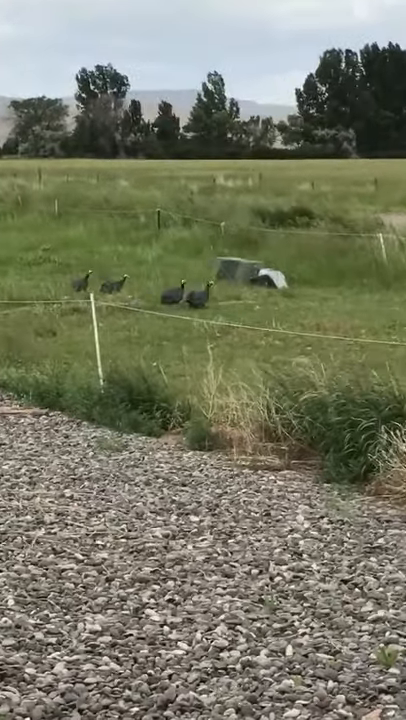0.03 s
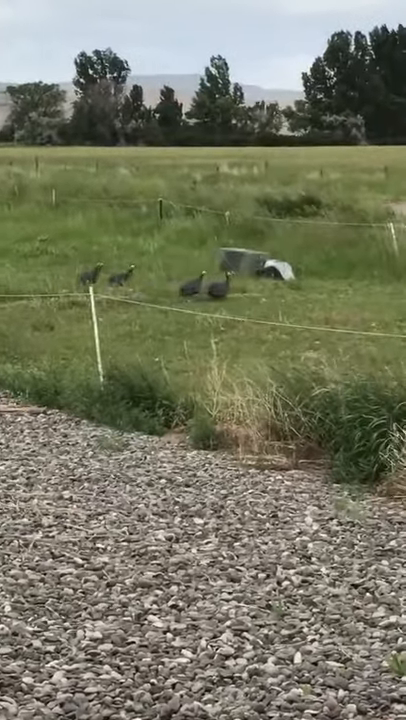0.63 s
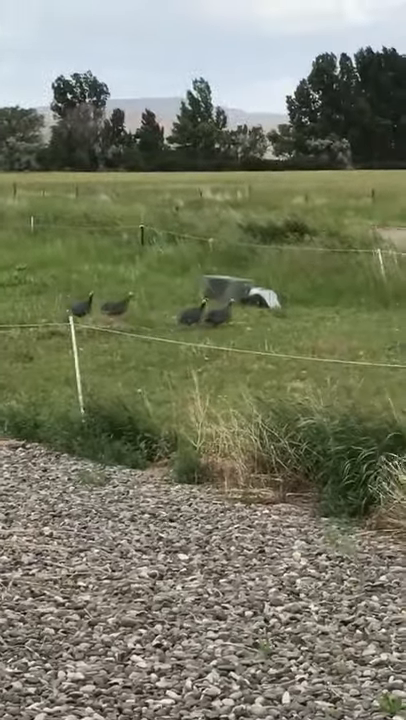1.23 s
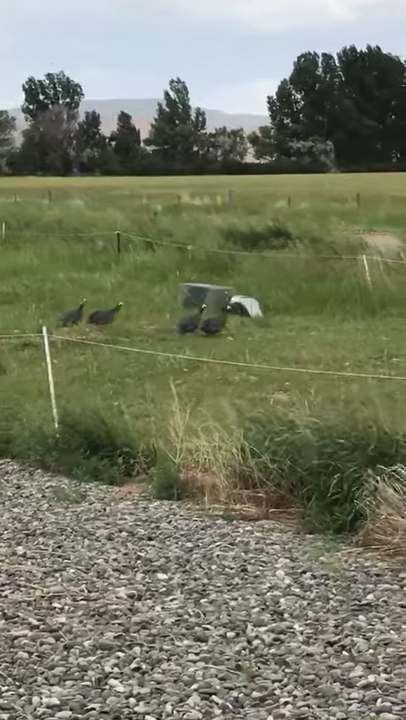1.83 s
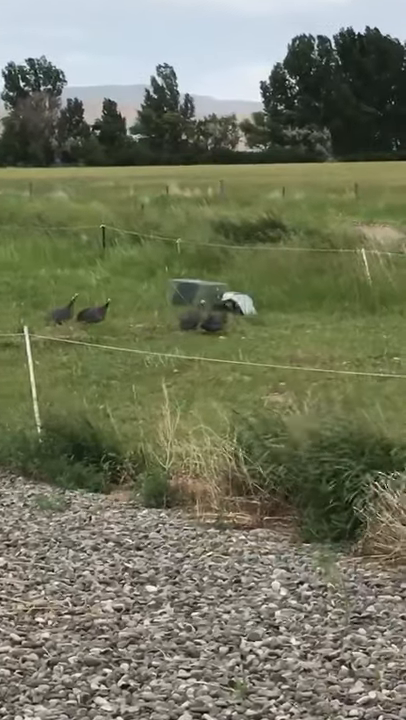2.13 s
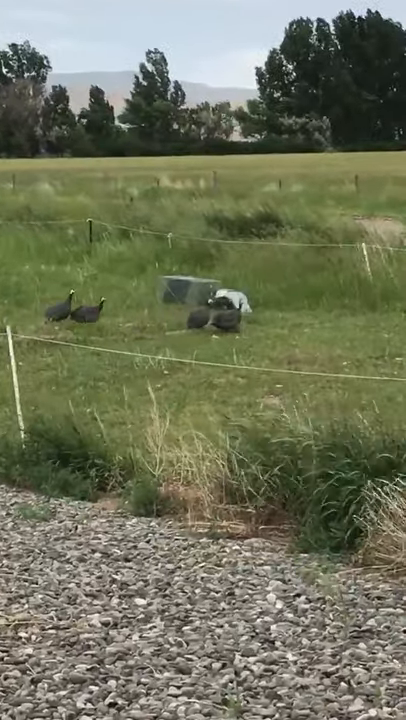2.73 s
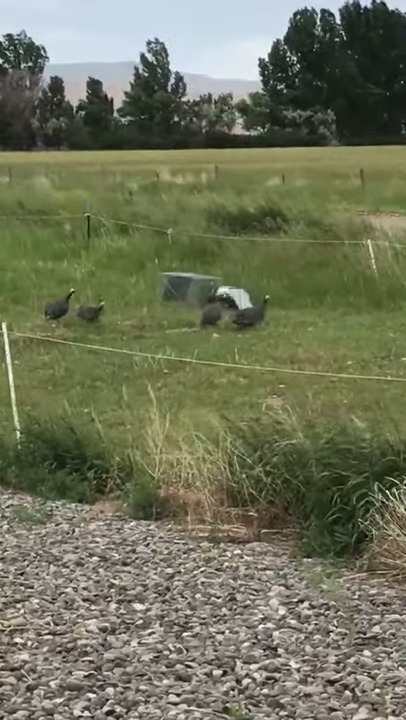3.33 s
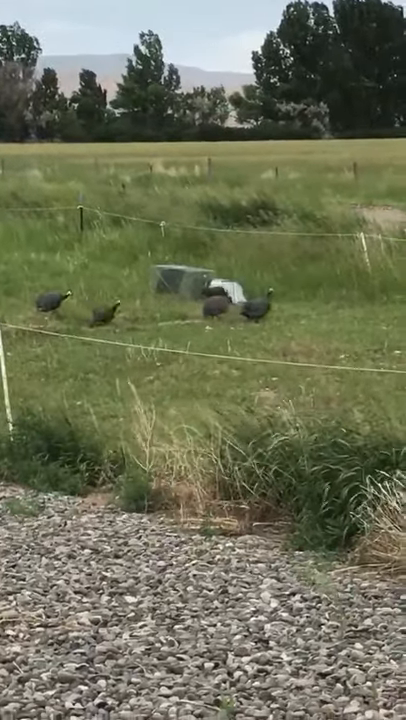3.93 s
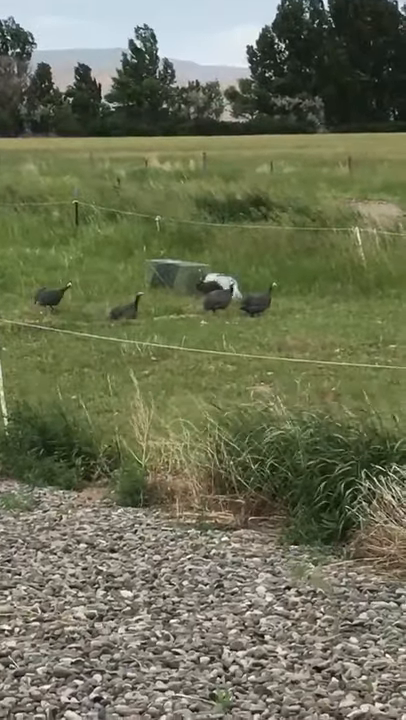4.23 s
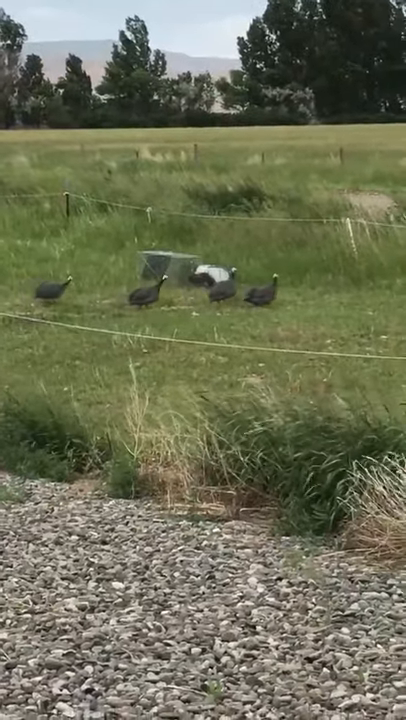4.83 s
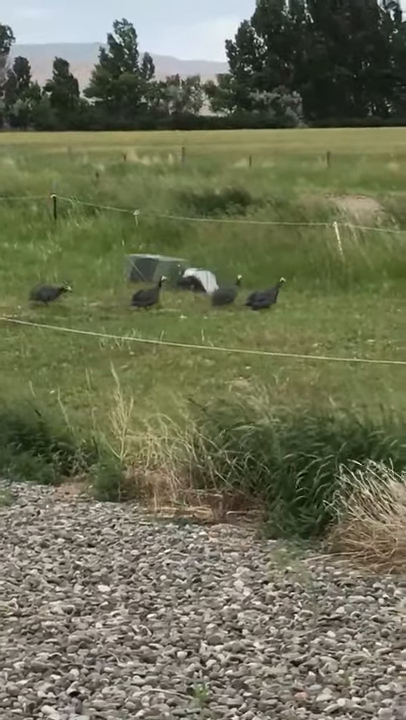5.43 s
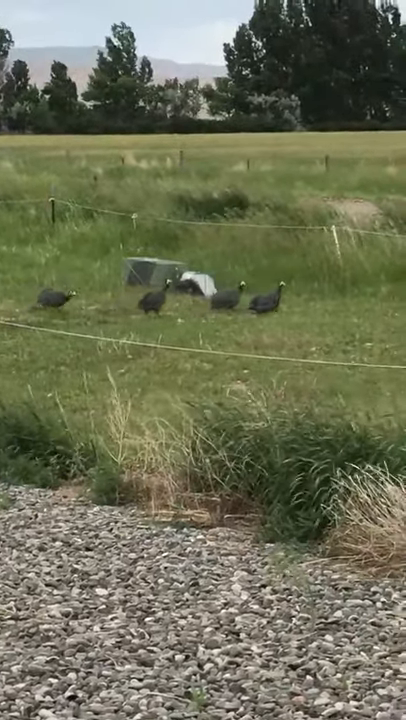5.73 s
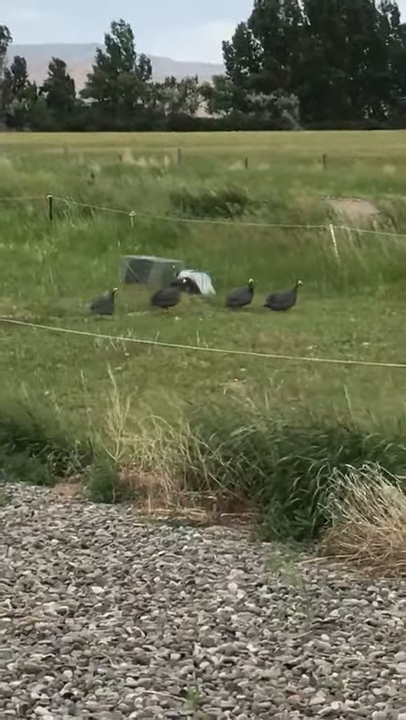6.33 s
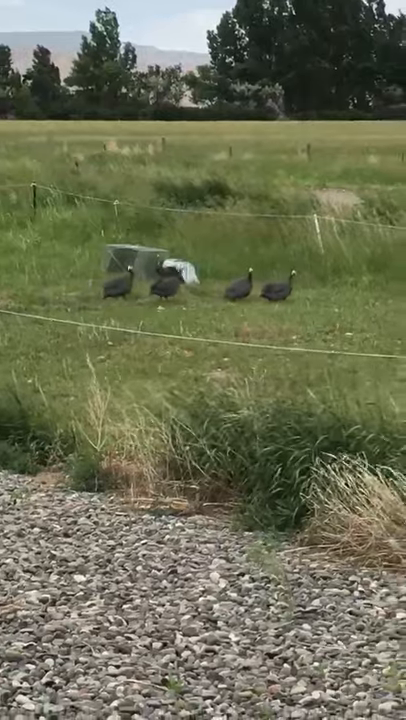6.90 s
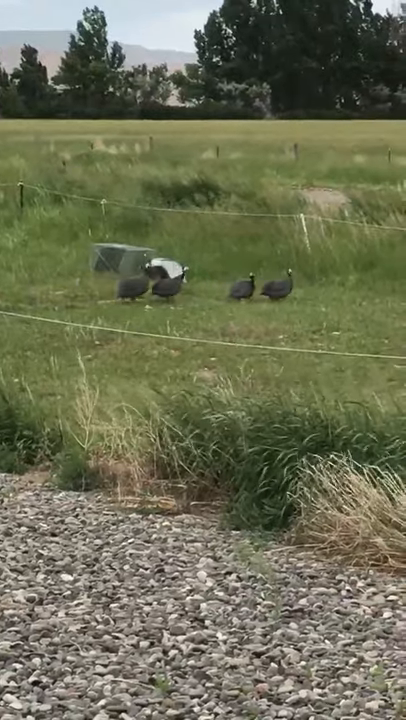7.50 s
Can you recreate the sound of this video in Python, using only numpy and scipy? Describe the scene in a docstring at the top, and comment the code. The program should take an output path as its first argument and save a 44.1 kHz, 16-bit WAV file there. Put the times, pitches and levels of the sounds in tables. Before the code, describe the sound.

Several guinea fowl call almost without pause in an open pasture, a few harsh rasps each second mixed with short shrill squeaks. Gusts of wind rumble and thump on the microphone, hardest in the first half. Then the wind eases and the calls stretch into nasal churrs, one ending in a rattle. The breeze picks up slightly under the last calls.

```python
"""Four guinea fowl sound the alarm across a pasture while wind buffets the microphone.
From the first moment, shrill tones near 1.5 kHz break into rasps: uneven pulses ringing the throat,
with a thin tail from the field. Gusts rumble and thump, hardest from about 1 to 4.5 s.
Then the wind eases and the calls lengthen into nasal churrs, one running out in a rattle at 5.3 s.
The breeze picks up a little under the last calls."""
import sys
import numpy as np
from scipy import signal
from scipy.io import wavfile
from scipy.ndimage import uniform_filter1d, minimum_filter1d

SR = 44100
rng = np.random.default_rng(int(sys.argv[2]) if len(sys.argv) > 2 else 0)


def file_out(sig):
    """Save sig as 16-bit WAV at sys.argv[1]."""
    # one column per channel
    cols = np.atleast_2d(sig).T
    # limit, then scale
    lim = np.clip(cols, -1, 1)
    pcm = np.round(lim * 32767).astype(np.int16)
    wavfile.write(sys.argv[1], SR, pcm)


N = 337806
T = np.arange(N) / SR

# EQ of the distant countryside and of the high hiss: f/Hz, gain/dB
COUNTRY_EQ = [(100, -2.5), (210, -2), (270, -10), (340, -6), (450, -10), (800, -10.5), (1500, -11),
              (2500, -18), (4000, -29), (6500, -34), (10000, -47), (15000, -39.5)]
HISS_EQ = [(3000, 1), (9500, 1.5), (10500, -4), (12000, 0), (15000, -5.5)]
# fader ride of the hiss, stepping down halfway: t/s, level/dB
HISS_RIDE = [(0, -67), (3.7, -68.5), (3.8, -77), (7.66, -86.5)]
# fader ride of the breeze under the gusts: t/s, rumble/dB (pre-trim)
BREEZE_RIDE = [(0, -12), (.4, -18), (.85, -23.5), (1.2, -22), (1.55, -20), (1.72, -25.5), (3.05, -24),
               (3.8, -26), (4.4, -27.5), (4.6, -36.5), (5.4, -31), (5.75, -35), (5.95, -47.5), (6.1, -43),
               (6.22, -40.5), (6.7, -31), (7.05, -35), (7.65, -28.5)]
# gusts: start/s, length/s, rumble/dB, turbulence/dB (both pre-trim)
GUST_CUES = [ (.01, .15, -17.5, -15.5), (0.217, 0.23, -33, -31.5), (1.004, 0.77, -20, -34.5),
             (1.547, 0.049, -12, -28.5), (1.809, 0.097, -12, -24), (1.879, 0.24, -15.5, -13),
             (2.09, 0.27, -19, -18), (2.561, 0.063, -16, -23), (2.598, 0.27, -18, -23),
             (2.872, 0.19, -26, -25), (3.1, .23, -18, -17.5), (3.33, 0.11, -19, -33),
             (3.489, 0.17, -18.5, -35.5), (3.884, 0.13, -13.5, -29), (4.036, 0.2305, -19.5, -32.5),
             (4.39, 0.11, -16, -39), (4.681, 0.049, -19.5, -30.5), (5.024, 0.039, -22, -33.5),
             (5.16, 0.16, -25.5, -53), (6.144, 0.049, -26.5, -57), (6.315, 0.052, -25, -59),
             (6.641, .08, -25, -36.5), (6.758, 0.097, -29, -51), (6.97, .045, -21, -40)]
# EQ of wind on the microphone, steady flow and hard gusts: f/Hz, gain/dB
RUMBLE_EQ = [(12, -29), (25, -34.5), (48, 5), (65, 5), (100, 1.5), (130, -1), (160, -7.5), (220, -15.5),
             (350, -33.5), (700, -54.5), (2000, -83.5)]
TURBULENCE_EQ = [(40, -25), (110, 6.5), (200, 7.5), (320, 3), (450, -9), (650, -13.5), (1000, -22.5),
                 (1500, -23.5), (2500, -43), (5000, -62.5), (9000, -92)]
# single buffets: t/s, thump/dB, half-width/s, pop/dB (levels pre-trim)
BUFFET_CUES = [(0.054, -25.5, 0.015, -19), (1.293, -7, 0.004, -21.5), (2.336, -10.5, 0.011, -36),
               (2.624, -6.5, 0.015, -45), (2.768, -1.5, 0.0063, -39), (2.959, -12, 0.015, -35),
               (3.565, -13.5, 0.0075, -41), (3.619, -10, .008, -50), (3.901, -9.5, 0.012, -32),
               (4.067, -14.5, 0.0093, -40), (4.41, -19, 0.0059, -48), (4.479, -13.5, 0.012, -47)]
# EQ of a buffet's dull thump and crisp pop: f/Hz, gain/dB
THUMP_EQ = [(30, -17), (90, 7.5), (160, 4), (320, -9.5), (600, -25.5), (1400, -42), (4000, -80)]
POP_EQ = [(120, -13.5), (350, 6), (700, -6), (1100, -15.5), (1550, -7.5), (2000, -28), (4000, -57.5)]
# EQ of the field's far tail: f/Hz, gain/dB
TAIL_EQ = [(2500, 10), (4500, 6.5), (8000, -35.5)]
# drawn-out nasal churrs: start/s, end/s, first pitch/Hz, last pitch/Hz, level/dB
CHURR_CUES = [(2.493, 2.661, 397.4, 376, -37), (4.551, 4.603, 376.8, 396.3, -51),
              (4.668, 4.779, 386.4, 378, -35.5), (4.92, 5.071, 386, 398, -41.5),
              (5.065, 5.248, 399.3, 387.7, -37), (6.691, 6.788, 531, 521.4, -37.5),
              (7.078, 7.24, 395.1, 384.4, -36.5)]
# EQ of a churr through a half-shut beak: f/Hz, gain/dB
CHURR_EQ = [(800, -29.5), (1200, -7.5), (1570, 0), (1950, 1), (2350, -2.5), (2750, -20.5),
            (3150, -13.5), (3520, -3), (3900, -14), (4250, -9), (5100, -35)]
# shrill tones: start/s, end/s, first pitch/Hz, last pitch/Hz, fundamental/dB, octave/dB (pre-trim)
SHRILL_CUES = [(0.092,0.176,1458,1540,-34,-44), (0.284,0.307,1360,1450,-35,-26),
               (0.488,0.514,1428,1475,-24.5,-28), (0.59,0.65,1520,1464,-41,-34.5),
               (0.791,0.854,1414,1555,-25.5,-26), (1.083,1.131,1421,1520,-26.5,-21),
               (1.379,1.428,1410,1471,-32,-23), (1.634,1.674,1480,1466,-29,-29),
               (1.861,1.911,1396,1498,-28.5,-27.5), (2.013,2.058,1542,1530,-26.5,-35),
               (2.086,2.133,1480,1523,-37.5,-32), (2.688,2.713,1470,1473,-36,-31),
               (2.704,2.768,1567,1524,-24,-41.5), (2.895,2.93,1547,1600,-33,-35),
               (3.107,3.15,1510,1532,-23.5,-29.5), (3.285,3.334,1494,1536,-30.5,-30.5),
               (3.491,3.527,1546,1560,-24.5,-33.5), (3.735,3.761,1545,1538,-30,-28),
               (3.796,3.827,1474,1470,-31,-34), (3.84,3.883,1364,1377,-40,-26),
               (4.252,4.326,1484,1550,-31,-34.5), (4.355,4.392,1429,1415,-34.5,-44.5),
               (4.433,4.478,1439,1504,-34.5,-27.5), (4.597,4.679,1430,1385,-36,-45),
               (4.814,4.854,1439,1465,-34,-28), (4.869,4.912,1399,1410,-36,-37),
               (5.202,5.251,1483,1485,-29,-29.5), (5.466,5.511,1504,1522,-27.5,-40),
               (5.792,5.833,1569,1497,-30,-31.5), (6.064,6.102,1398,1502,-38.5,-31.5),
               (6.614,6.667,1345,1409,-31,-27.5), (6.792,6.857,1420,1409,-38.5,-35),
               (7.263,7.336,1550,1575,-33.5,-50), (7.499,7.561,1523,1584,-35,-59)]
# EQ of the tones, whose highest overtone barely passes the beak: f/Hz, gain/dB
SHRILL_EQ = [(3200, .5), (4300, -1), (4800, -9), (6000, -27)]
# rasping calls: start/s, length/s, swell/s, level/dB, fade by the end/dB, treble against body/dB,
# pulse rate/Hz, roughness/0-1
RASP_CUES = [ (0.0, 0.039, 0.0093, -26, 11, -17, 270.6, 0.84),
             (0.095, 0.097, 0.012, -25.5, 7.5, -9.5, 264.6, 0.75),
             (.279, .13, 0.077, -20.5, 18.5, -16, 259.8, 0.79),
             (0.438, .11, 0.016, -28, 10, -21.5, 249.9, 0.74),
             (0.585, 0.12, .055, -20, 16.5, -17, 249.3, 0.68), (.793, .072, .018, -26.5, 5, -15, 300, 0.72),
             (0.857, 0.16, 0.023, -21.5, 9.5, -16, 322.3, 0.79),
             (1.145, 0.13, 0.029, -21.5, 18, -14.5, 310.4, .75),
             (1.383, 0.11, 0.023, -19, 23, -13, 290.6, 0.68),
             (1.586, 0.061, 0.018, -29.5, 0.5, -19, 278.8, 0.66),
             (1.635, .105, .055, -21.5, 24, -14.5, 280, .72),
             (1.806, 0.17, .014, -22, 13.5, -14, 274.4, .7),
             (2.001, 0.097, 0.0093, -23.5, 15.5, -13.5, 265, 0.69),
             (2.102, 0.057, 0.049, -30, 7, -15.5, 259.7, 0.54),
             (2.178, .11, 0.068, -27.5, 15, -19, 254, 0.69),
             (2.296, 0.1, 0.032, -22, 15, -16.5, 259.2, 0.66), (2.499, .1, 0.012, -27, 6.5, -11, 301, 0.44),
             (2.58, .1, .03, -33, 5.5, -16, 299, 0.49), (2.698, 0.11, 0.029, -22.5, 19, -17.5, 379.5, 0.63),
             (2.884, .11, 0.048, -25, 19.5, -15, 380.8, .63),
             (3.103, 0.097, 0.024, -21.5, 21.5, -15.5, 379, 0.63),
             (3.279, 0.083, 0.071, -21, 9, -16.5, 344.4, .6),
             (3.363, 0.098, 0.011, -32, 8.5, -26.5, 329.9, .6),
             (3.49, 0.098, 0.018, -19.5, 28.5, -16, 308.4, 0.62),
             (3.745, 0.099, 0.037, -24, 2, -21, 285.3, 0.57), (3.83, .155, .04, -27, 13.5, -12.5, 271, .45),
             (4.003, .19, 0.061, -28.5, 8, -13.5, 259.2, 0.56),
             (4.237, 0.032, 0.0097, -30.5, 0, -18, 244.9, .6),
             (4.257, .092, 0.046, -23.5, 14, -17.5, 246.7, 0.68),
             (4.353, .075, 0.014, -25, 14, -14.5, 241.6, 0.65),
             (4.427, 0.08, 0.053, -31.5, 5.5, -19, 261.7, .55),
             (4.54, 0.23, 0.1, -25, 15.5, -13, 282.3, .45),
             (4.819, 0.23, .076, -23.5, 14, -13.5, 289.4, .55), (5.039, 0.18, 0.011, -28, 5, -8, 325, 0.47),
             (5.206, 0.13, .026, -23.5, 6.5, -14, 296, .5), (5.3, .17, 0.023, -30, 0.5, -14, 235.6, 0.36),
             (5.463, 0.097, 0.044, -21.5, 8.5, -14.5, 299.2, 0.65),
             (5.549, 0.093, .035, -25, 11.5, -13, 277.5, 0.64),
             (5.679, 0.072, .015, -30.5, 6, -9.5, 260.3, 0.64),
             (5.795, 0.073, .02, -21.5, 1, -13.5, 298.6, 0.65),
             (5.853, 0.096, 0.061, -24.5, 21, -16.5, 296.1, .6),
             (5.985, 0.061, .022, -20.5, 12, -13.5, 296.6, 0.73),
             (6.057, .078, 0.046, -25, 8, -5.5, 288.8, 0.8),
             (6.343, 0.027, 0.0044, -48, 12, -18, 280, 0.53), (6.558, 0.14, .105, -23.5, 4, -16, 276, 0.43),
             (6.7, .1, 0.028, -31, 0, -13, 284.7, .45), (6.788, .088, 0.035, -23.5, 17, -15, 283.7, 0.59),
             (7, .25, 0.054, -25, 11.5, -14.5, 299.1, 0.66),
             (7.265, .17, 0.056, -22.5, 17, -15.5, 312.8, .5), (7.495, 0.099, .014, -24, 24, -14, 310, .48)]
# EQ of the rasp, body from the throat and treble from a wide open beak: f/Hz, gain/dB
THROAT_EQ = [(500, -43.5), (850, -28.5), (1000, -15.5), (1250, -18.5), (1480, -2), (1720, -13.5),
             (2050, -4), (2400, 2), (2750, -6), (3200, -12.5), (3700, -20), (4500, -28.5), (6000, -55.5)]
BEAK_EQ = [(2000, -28.5), (3000, -3.5), (3500, 8), (3900, 6.5), (4250, 2.5), (4700, -4.5), (5200, -10),
           (5800, -20.5), (6500, -25.5), (8500, -29), (11000, -45)]


def gain_of(db):
    """Decibels to amplitude."""
    return 10 ** (np.asarray(db) / 20)


def evened(x):
    """Scales to rms 1."""
    return x / np.sqrt(np.mean(x ** 2) + 1e-20)


def steadied(x, size):
    """Fast leveller: holds the rms near 1 over stretches of size samples."""
    return x / np.sqrt(abs(uniform_filter1d(uniform_filter1d(x ** 2, size), size)) + 1e-12)


def colour(x, eq):
    """Causal equaliser following a table of f/Hz, gain/dB."""
    hz, db = np.transpose(eq)
    size = 8192
    bin_hz = abs(np.fft.fftfreq(size, 1 / SR))
    log_gain = np.log(gain_of(np.interp(np.log(bin_hz + 1), np.log(hz), db)))
    ring = np.fft.ifft(np.exp(np.conj(signal.hilbert(log_gain)))).real  # minimum phase
    return signal.oaconvolve(x, ring[:size // 2])[:len(x)]


def noise():
    """Fresh white noise for the whole scene."""
    return rng.standard_normal(N)


def wander(hz):
    """Random drift of rms 1, rolled off above hz."""
    return evened(signal.sosfilt(signal.butter(2, hz, fs=SR, output="sos"), noise()))


def resonate(x, hz, width_hz):
    """A resonance of gain 1 at hz, steady or swept."""
    turn = np.exp(2j * np.pi * np.cumsum(np.broadcast_to(hz, len(x))) / SR)
    pole = np.exp(-np.pi * width_hz / SR)
    return 2 * (turn * signal.lfilter([1 - pole], [1, -pole], x / turn)).real


def fader(ride):
    """Gain at every sample from a table of t/s, level/dB."""
    return gain_of(np.interp(T, *np.transpose(ride)))


def gate(start, end, rise, fall):
    """The samples of one cue and its soft-edged envelope; times in seconds."""
    at = np.arange(max(int(start * SR), 0), min(int(end * SR), N))
    return at, np.clip((T[at] - start) / rise, 0, 1) * np.clip((end - T[at]) / fall, 0, 1)


def country_air(wash_db=-56, hum_db=-62, whine_db=-85, hum_hz=340, whine_hz=13820):
    """The bed: a faint wash of open country, a far wavering hum, thin hiss and a slight whine."""
    hum = evened(resonate(resonate(noise(), hum_hz, width_hz=14), hum_hz, width_hz=28))
    hiss = fader(HISS_RIDE) * evened(colour(noise(), HISS_EQ))
    whine = evened(resonate(noise(), whine_hz, width_hz=200))
    wash = evened(colour(noise(), COUNTRY_EQ))
    return gain_of(wash_db) * wash + hiss + gain_of(whine_db) * whine + gain_of(hum_db) * hum


def wind_envelopes(rumble_sag_db=.5, turbulence_sag_db=2.5):
    """Gains of rumble and turbulence: gusts rise quickly over the breeze, sag and drop away."""
    rumble = fader(BREEZE_RIDE)
    turbulence = np.hypot(rumble * gain_of(-20.5), gain_of(-60))  # a trace remains in the lulls
    for start, length, rumble_db, turbulence_db in GUST_CUES:
        at, edges = gate(start, start + length, rise=.011, fall=.023)
        share = np.linspace(0, 1, len(at))
        rumble[at] = np.hypot(rumble[at], edges * gain_of(rumble_db - rumble_sag_db * share))
        burst = edges ** 2 * gain_of(turbulence_db - turbulence_sag_db * share)
        turbulence[at] = np.hypot(turbulence[at], burst)
    return rumble, turbulence


def wind(rumble_trim_db=-2, turbulence_trim_db=-1, flutter_db=3.5, flap_db=5):
    """Eddies at the microphone: a deep fluttering rumble, and ragged flaps in the gusts."""
    rumble, turbulence = wind_envelopes()
    flow = steadied(colour(noise(), RUMBLE_EQ), size=1500) * gain_of(flutter_db * wander(21))
    flaps = gain_of(flap_db * np.tanh(wander(35)))
    gust = steadied(colour(noise(), TURBULENCE_EQ), size=900) * flaps
    return gain_of(rumble_trim_db) * rumble * flow + gain_of(turbulence_trim_db) * turbulence * gust


def buffets(thump_trim_db=-2):
    """Single eddies hit the microphone with a dull thump; some also pop."""
    thump = steadied(colour(noise(), THUMP_EQ), size=500)
    pop = steadied(colour(noise(), POP_EQ), size=300)
    blows = [np.exp(-((T - time) / half_width) ** 2) for time, _, half_width, _ in BUFFET_CUES]
    _, thump_db, _, pop_db = np.transpose(BUFFET_CUES)
    return (gain_of(thump_db + thump_trim_db) @ blows) * thump + (gain_of(pop_db) @ blows) * pop


def field(calls, near_db=-9, near_t60=.22, far_db=-22, far_t60=.39):
    """Ground and shelters scatter the calls at once; fences and trees return a thin, duller tail."""
    t = T[:SR]
    # sparse reflections, about 2000 a second, after a 2 ms pre-delay
    near, far = rng.standard_normal((2, SR)) * (rng.random((2, SR)) < 2000 / SR) * (t > .002)
    near = near * gain_of(-60 * t / near_t60)
    far = colour(far * gain_of(-60 * t / far_t60), TAIL_EQ)
    echoes = gain_of(near_db) * near / np.linalg.norm(near) + gain_of(far_db) * far / np.linalg.norm(far)
    return calls + signal.oaconvolve(calls, echoes)[:N]


def churr():
    """Steady pulses through a half-shut beak; a resonance slides down as the bird runs out of air."""
    shake, out = 1 + .006 * wander(120), np.zeros(N)
    for start, end, first_hz, last_hz, db in CHURR_CUES:
        at, edges = gate(start, end, rise=.013, fall=.089)
        turns = np.cumsum(np.linspace(first_hz, last_hz, len(at)) * shake[at]) / SR
        pulses = sum(np.cos(2 * np.pi * k * turns) for k in range(2, 14))
        voice = colour(pulses, CHURR_EQ)
        voice += 2 * resonate(voice, np.linspace(2350, 1800, len(at)), width_hz=300)
        out[at] += gain_of(db) * edges * evened(voice)
    return out


def shrill(bend=.009, jitter=.0042, arch=.0065, flutter_db=.97, trim_db=-1):
    """The syrinx's fast vibration: a gliding, slightly arched and shaky tone with three overtones."""
    shake = 1 + bend * wander(25) + jitter * wander(300)
    flutter = gain_of(flutter_db * wander(130))
    out = np.zeros(N)
    for start, end, first_hz, last_hz, fundamental_db, octave_db in SHRILL_CUES:
        at, edges = gate(start - .002, end + .002, rise=.006, fall=.014)
        bow = 1 + arch * (.5 - 2 * np.linspace(-1, 1, len(at)) ** 2)
        hz = np.linspace(first_hz, last_hz, len(at)) * bow * shake[at]
        phase = 2 * np.pi * np.cumsum(hz) / SR
        overtones = sum(gain_of(db) * np.sin(k * phase) for k, db in [(2, 0), (3, -14), (4, -19)])
        tone = gain_of(fundamental_db) * np.sin(phase) + gain_of(octave_db) * overtones
        out[at] += edges * flutter[at] * tone
    return gain_of(trim_db) * colour(out, SHRILL_EQ)


def rattle(start=5.31, end=5.465, beat_hz=70, depth=.55):
    """One long call runs out in a rattle: a tremolo gain that chops the rasp."""
    at, edges = gate(start, end, rise=.023, fall=.01)
    chop = np.ones(N)
    chop[at] += depth * edges * np.sin(2 * np.pi * beat_hz * T[at] + .5 * wander(30)[at])
    return chop


def rasp_envelopes(swell_db=6, shut_beak_db=-3.5, dulling_db=5.5, pulse_sag=.07):
    """Each call swells, then fades ever faster; it dulls and its pulses slow as the air runs out."""
    progress, level, bright, pulse_hz, rough = np.zeros((5, N))
    for start, length, swell, db, fade_db, treble_db, mid_call_hz, roughness in RASP_CUES:
        at, edges = gate(start - .002, start + length + .008, rise=.006, fall=.018)
        t, share = T[at] - start, np.linspace(0, 1, len(at))
        to_peak = np.clip(1 - t / swell, 0, 1)
        past_peak = np.maximum(t - swell, 0) / max(length - swell, .006)
        shape_db = -swell_db * to_peak ** 1.6 - fade_db * past_peak ** 1.34
        level[at] = np.maximum(level[at], edges * gain_of(db + shape_db))
        beak_db = shut_beak_db * (2 * share - 1) ** 2  # nearly shut at both ends of a call
        bright[at] = gain_of(treble_db + beak_db + dulling_db * (.5 - share))
        progress[at] = share
        rough[at[0]:], pulse_hz[at[0]:] = roughness, mid_call_hz  # held until the next call
        pulse_hz[at] *= 1 + pulse_sag * (.5 - share)
    return uniform_filter1d(progress, size=400), level, uniform_filter1d(bright, size=400), pulse_hz, rough


def rasp(jitter=.1, uneven_db=3, puff_turns=.24, throat_sag=.16):
    """The syrinx pulses unevenly; overtones and puffs of air ring a throat that sags through each call."""
    progress, level, bright, pulse_hz, rough = rasp_envelopes()
    turns = np.cumsum(pulse_hz * np.exp(jitter * rough ** 2 * wander(90))) / SR
    # chaotic vibration: each overtone comes and goes on its own
    overtones = sum(gain_of(5 * wander(25)) * np.cos(2 * np.pi * (k * turns + rng.random()))
                    for k in range(2, 23))
    puffs = (.09 + np.exp(-(turns % 1) / puff_turns)) * noise()
    drive = evened(overtones) + np.clip(2 * rough, 0, 1) * evened(puffs)
    throat_hz = 2520 * (1 - throat_sag * progress) * (1 + .03 * wander(12))
    beak_hz = 3100 + 1250 * np.sqrt(abs(np.sin(np.pi * progress)))  # the beak opens and shuts
    body = colour(drive * gain_of(uneven_db * wander(140)), THROAT_EQ)
    body += gain_of(5) * resonate(body, throat_hz, width_hz=300)
    treble = colour(drive, BEAK_EQ)
    treble += gain_of(6) * resonate(treble, beak_hz, width_hz=900)
    return level * (steadied(body, size=500) + bright * steadied(treble, size=500))


def scene():
    """The mono mix: birds in the field's reverb, dry wind and the bed of distant air."""
    birds = rasp() * rattle() + shrill() + churr()
    return (field(birds) + wind() + buffets() + country_air())[None]


def record(dry):
    """A limiter turns down the hardest wind peaks; then a steep high cut at 15.7 kHz."""
    needed_gain = 1 / np.maximum(abs(dry), 1)
    limited = dry * uniform_filter1d(minimum_filter1d(needed_gain, size=401), size=201)
    high_cut = signal.firwin(511, 15700, window=("kaiser", 9), fs=SR)
    return signal.oaconvolve(limited, high_cut[None], "same")


dry = scene()
out = record(dry)
file_out(out)
```